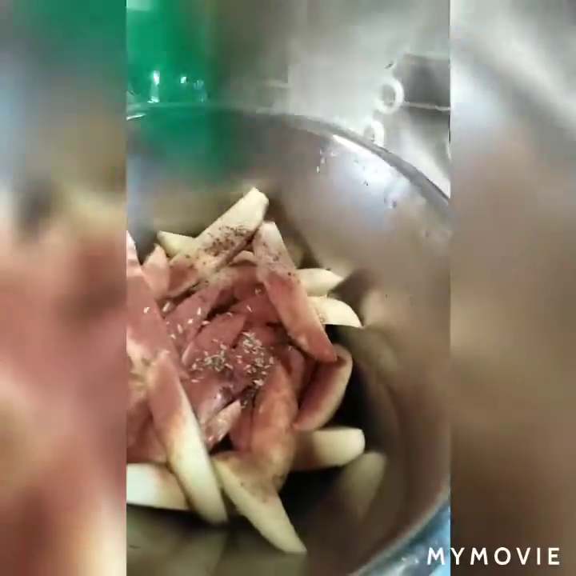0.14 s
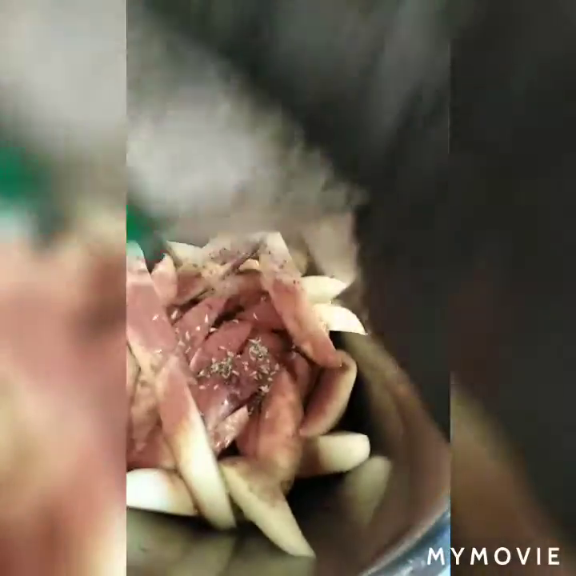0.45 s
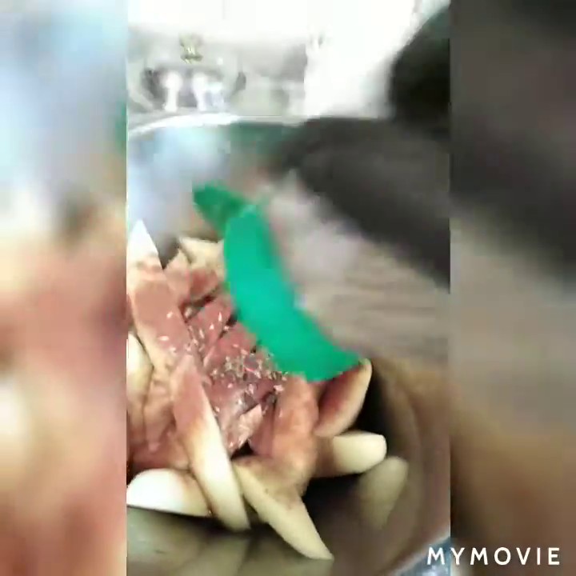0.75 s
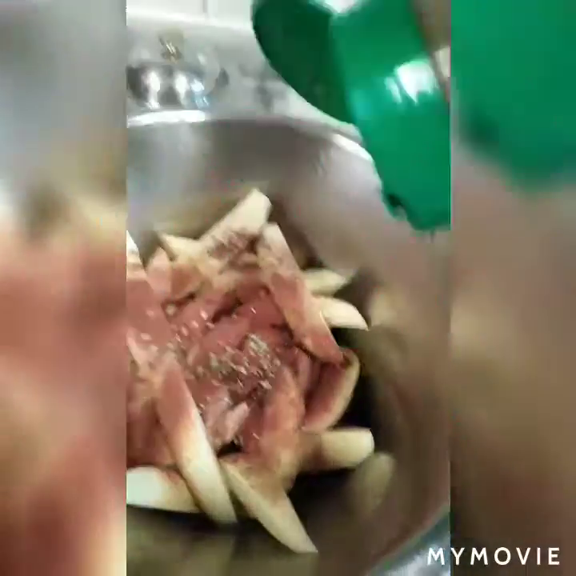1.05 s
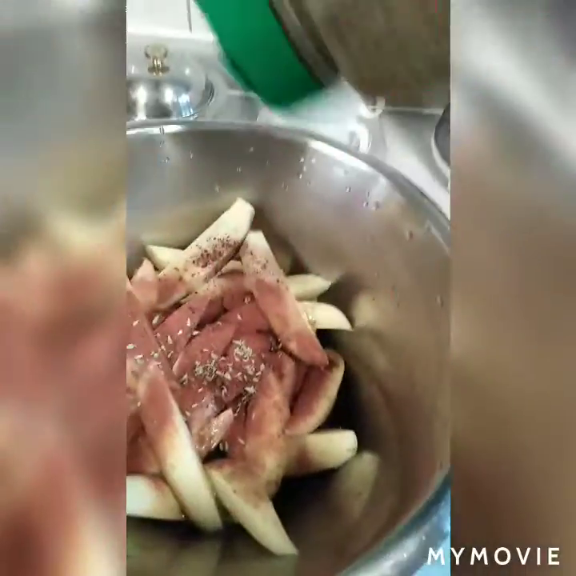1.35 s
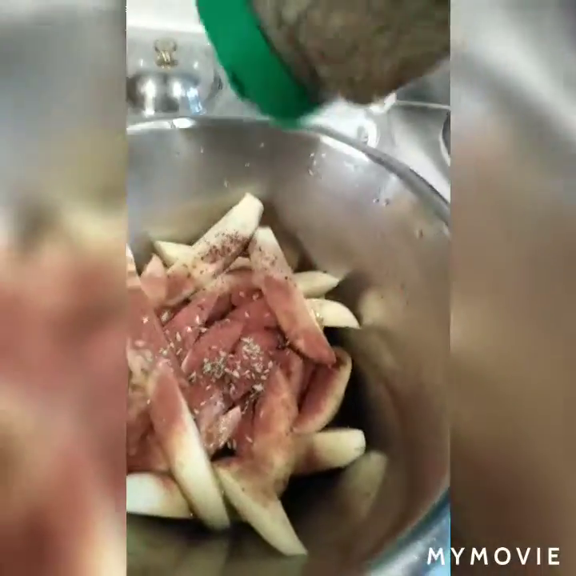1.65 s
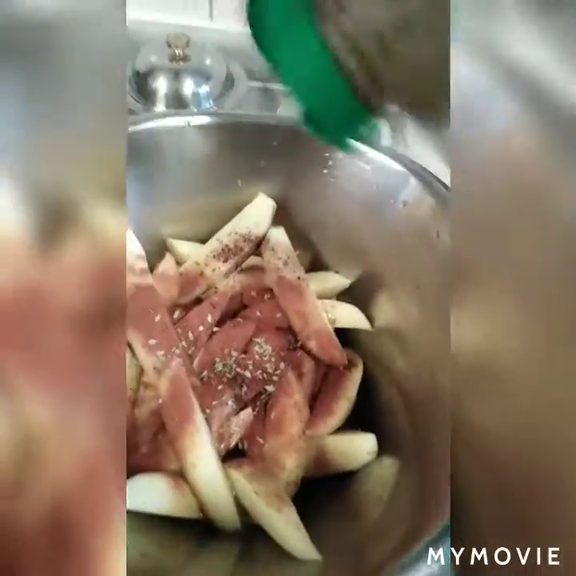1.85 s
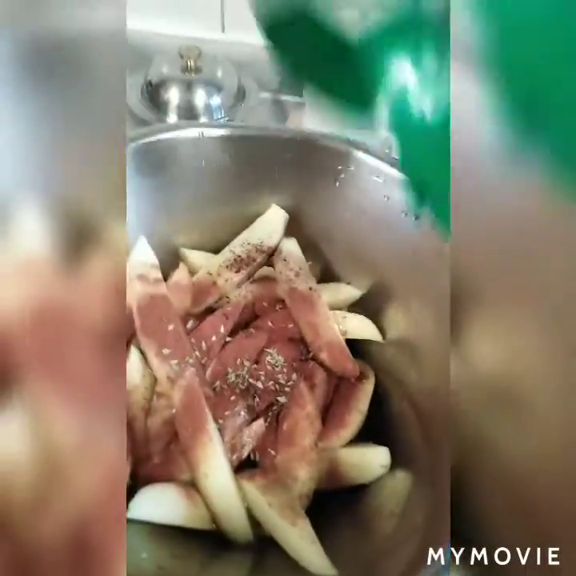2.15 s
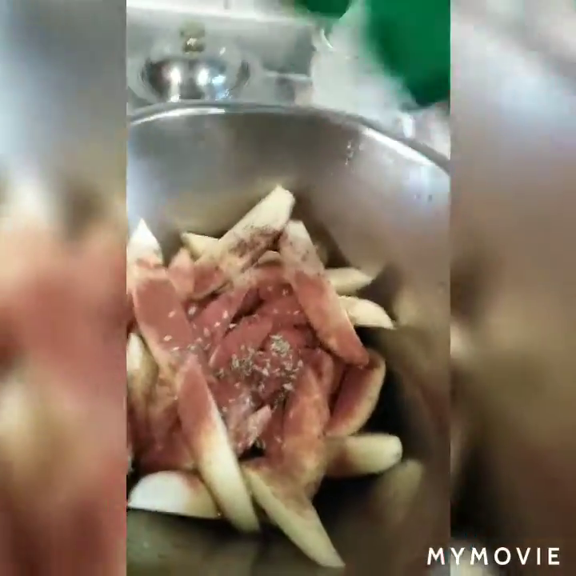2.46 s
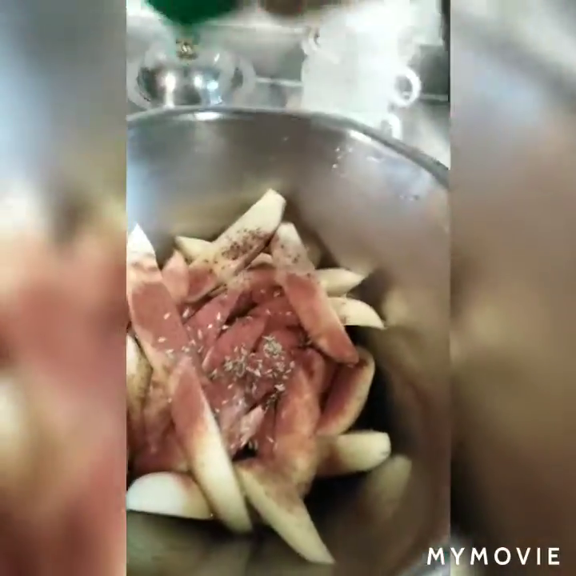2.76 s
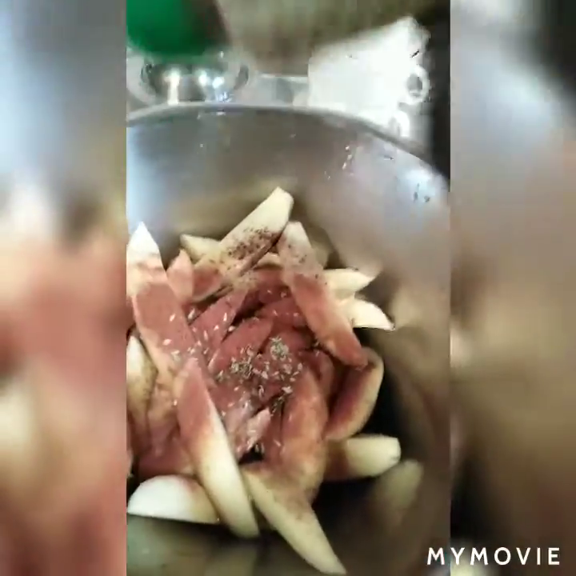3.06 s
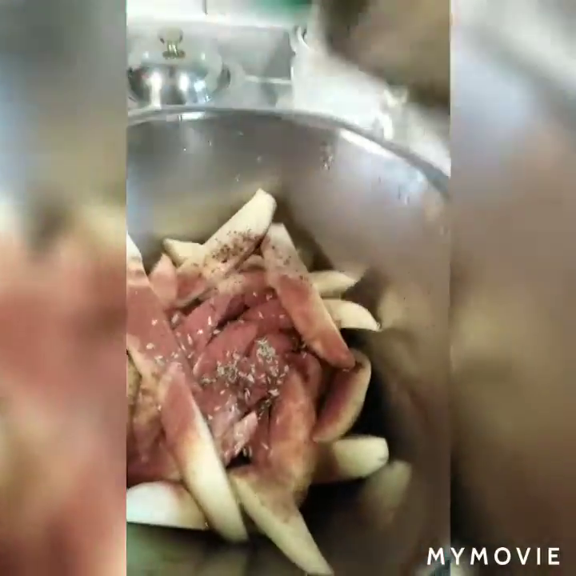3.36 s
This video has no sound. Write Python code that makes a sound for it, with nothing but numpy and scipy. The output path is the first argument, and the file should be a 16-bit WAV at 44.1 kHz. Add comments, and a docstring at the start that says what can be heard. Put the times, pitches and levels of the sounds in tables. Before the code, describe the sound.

Dried herbs shaken in a capped jar, quick hissing rushes with a few hollow knocks

```python
"""Dried herbs shaken in a plastic-capped jar over potatoes in a steel bowl, close by in a small kitchen.
Flakes rush to and fro about ten times a second: random impulses, coloured as hiss and lower rustle.
A few crisp ticks are bright noise bursts. Knocks at the start and near the end sum damped jar modes,
a noise crack and bowl modes; one clearly rings the bowl. A reverberant kitchen surrounds them.
An appliance drones low behind: coloured noise and a faint hum, with a rumble of changing level."""
import sys
import numpy as np
from scipy import signal
from scipy.fft import rfft, irfft
from scipy.io import wavfile

SR = 44100
rng = np.random.default_rng(int(sys.argv[2]) if len(sys.argv) > 2 else 0)


def master(y):
    """Save y as 16-bit WAV."""
    cut = np.clip(np.atleast_2d(y).T, -1, 1)
    pcm = np.round(cut * 32767)  # scale
    wavfile.write(sys.argv[1], SR, pcm.astype(np.int16))


N = 154350
T = np.arange(N) / SR
BAND_EDGE_HZ = 14260


def amp(db):
    """Decibels to gain."""
    return 10 ** (np.asarray(db) / 20)


def unit(x):
    """Scales to rms 1."""
    return x / np.sqrt(np.mean(x ** 2) + 1e-20)


def curve(points):
    """Joins timed points by straight lines."""
    return np.interp(T, *np.transpose(points))


def read(points, hz):
    """Reads a table on a log-frequency axis."""
    point_hz, value = np.transpose(points)
    return np.interp(np.log(hz + 1), np.log(point_hz + 1), value)


def add(mix, start_s, sound):
    """Mixes a sound in at a time."""
    part = mix[max(round(start_s * SR), 0):][:len(sound)]
    part += sound[:len(part)]


def colour(x, points, size=4096):
    """Minimum-phase filter with the given spectrum shape; keeps the power of white noise."""
    bin_hz = abs(np.fft.fftfreq(size, 1 / SR))
    log_gain = np.log(amp(read(points, bin_hz)))
    # the Hilbert transform of the log gain gives the causal phase
    response = np.exp(np.conj(signal.hilbert(log_gain)))
    taps = np.fft.ifft(response).real[:size // 2]
    return signal.oaconvolve(x, taps / np.linalg.norm(taps))[:N]


def wander(rate_hz):
    """Smooth random motion of rms 1: noise under a Gaussian low-pass."""
    hz = np.fft.rfftfreq(N, 1 / SR)
    spectrum = rfft(rng.standard_normal(N)) * np.exp(-(hz / rate_hz) ** 2)
    return unit(irfft(spectrum, N))


def flakes(rate_per_s=9000, spread_db=2.5):
    """Dense tiny collisions: random-sign impulses of uneven size."""
    size = amp(spread_db * np.minimum(rng.exponential(1, N), 5))
    sign = rng.choice([-1., 1.], N)
    hit = rng.random(N) < rate_per_s / SR
    return unit(size * sign * hit)


def herbs(clump_db=1.0, clump_hz=70):
    """Each rush swells, holds and settles; flake-on-flake hiss and wall rustle share the clumping."""
    # rushes: start_s, length_s, level_db (before band gain), extra_rustle_db, rise_s
    rushes = [(.003, 0.0051, -38, -24, 0.00067), (0.257, 0.016, -34.5, 2, 0.0091),
              (.317, 0.018, -29.5, -1, 0.013), (0.409, 0.095, -53, 1.5, .01),
              (0.603, 0.017, -37.5, -1, 0.0035), (.659, 0.019, -36.5, 0.5, 0.018),
              (.789, 0.037, -36.5, 4, 0.0058), (0.862, 0.018, -35, -0.5, 0.014),
              (0.893, 0.029, -42, 3.5, .01), (.987, 0.034, -37.5, 0, 0.016),
              (1.06, 0.044, -38, -0.5, 0.013), (1.187, 0.052, -41, -2, 0.024),
              (1.256, 0.033, -40, -0.5, 0.0055), (1.354, 0.037, -47.5, 1.5, 0.012),
              (1.433, 0.026, -40.5, -2, 0.021), (1.526, 0.034, -49.5, 5, 0.006),
              (1.603, 0.012, -41.5, -0.5, 0.015), (1.694, 0.027, -46, 0, 0.0053),
              (1.772, 0.017, -41, 0.5, 0.01), (1.908, 0.049, -44.5, -0.5, 0.0071),
              (1.997, 0.029, -38.5, -1, 0.019), (2.13, 0.042, -44.5, 2.5, 0.023),
              (2.225, 0.031, -37.5, -1.5, 0.015), (2.348, 0.047, -42.5, -0.5, 0.017),
              (2.446, 0.03, -37.5, 1.5, 0.021), (2.498, 0.038, -51, -11, .01),
              (2.572, 0.035, -45, 0.5, 0.0052), (2.669, 0.038, -38.5, 0.5, 0.012),
              (2.959, 0.028, -40.5, 0, 0.0048), (3.029, .02, -35, 2, 0.018),
              (3.299, 0.026, -38.5, -5, 0.0084), (3.365, 0.02, -34.5, 2, 0.018), (3.424, .08, -58, 6, .01)]
    # loose flakes between rushes: time_s, level_db (before band gain)
    trickle = [(0, -55.5), (.2, -61.5), (.4, -59), (.56, -61), (.75, -65), (1.4, -52), (1.87, -58),
               (2.7, -51.5), (2.86, -67.5), (2.92, -80), (3.0, -65), (3.2, -56), (3.5, -52)]
    # sizzle of flake on flake: freq_hz, relative_density_db_per_hz
    hiss_shape = [(300, -33), (2000, -4.5), (4000, -8.5), (5500, -5), (7500, -0.5), (9500, -1.5),
                  (11500, 0.5), (14000, -3)]
    # rustle on the jar wall: freq_hz, relative_density_db_per_hz
    rustle_shape = [(60, -28), (200, -11), (400, 7.5), (600, -3.5), (1000, 0), (1500, -3.5), (2100, -0.5),
                    (2700, -1.5), (3600, 0.5), (5000, 0.5), (8000, -9), (14000, -10)]
    fall_s, settle_s, settle_db = 0.015, 0.042, -17  # fast fall, then slower settling
    hiss_db, rustle_db = 2, -4

    hiss_power = rustle_power = amp(curve(trickle)) ** 2
    for start_s, length_s, level_db, extra_rustle_db, rise_s in rushes:
        before_s = np.maximum(start_s - T, 0)
        after_s = np.maximum(T - start_s - length_s, 0)
        fall = np.exp(-after_s / fall_s)
        settle = amp(settle_db) * np.exp(-after_s / settle_s)
        level = amp(level_db) * np.exp(-before_s / rise_s) * np.maximum(fall, settle)
        hiss_power = hiss_power + level ** 2
        rustle_power = rustle_power + (level * amp(extra_rustle_db)) ** 2
    clumps = amp(clump_db * wander(clump_hz))
    hiss = colour(flakes() * clumps * np.sqrt(hiss_power), hiss_shape)
    rustle = colour(flakes() * clumps * np.sqrt(rustle_power), rustle_shape)
    return amp(hiss_db) * hiss + amp(rustle_db) * rustle


def patchy(x, patch_db, patch_hz=600, patch_s=0.015, size=512):
    """The colour shifts in small random time-frequency patches as the heap of flakes tumbles."""
    hz, t, z = signal.stft(x, SR, nperseg=size)
    across_hz = np.fft.fftfreq(len(hz), hz[1])[:, None] * patch_hz
    across_s = np.fft.fftfreq(len(t), t[1]) * patch_s
    blur = np.exp(-across_hz ** 2 - across_s ** 2)
    field = unit(np.fft.ifft2(np.fft.fft2(rng.standard_normal(z.shape)) * blur).real)
    return signal.istft(z * unit(amp(patch_db * field)), SR, nperseg=size)[1][:N]


def ticks():
    """Crisp ticks at the cap: decaying noise bursts with a bright spectrum."""
    # ticks: start_s, level_db, decay_s (time constant)
    tick_list = [(0.568, -43, 0.021), (0.5966, -29, 0.0014), (.962, -34, 0.0056), (1.01, -32.5, 0.012),
                 (1.187, -29, 0.015), (1.306, -36.5, .004), (2.092, -35, 0.01), (2.307, -33, 0.0077),
                 (2.878, -54.5, 0.015)]
    # tick spectrum: freq_hz, relative_density_db_per_hz
    tick_shape = [(300, -47), (3000, -8), (5000, -1), (6500, 9.5), (8300, 7), (10000, -2), (14500, 1)]
    out, t = np.zeros(N), T[:SR // 10]
    for start_s, level_db, decay_s in tick_list:
        add(out, start_s, amp(level_db) * np.exp(-t / decay_s) * rng.standard_normal(len(t)))
    return colour(out, tick_shape)


def ring(modes, t, hardness_hz):
    """Dying modes after a blow; a soft blow hardly reaches the high ones."""
    out = 0
    for freq_hz, level_db, t60_s in modes:
        reach = 1 / np.hypot(1, (freq_hz / hardness_hz) ** 2)
        out = out + reach * amp(level_db - 60 * t / t60_s) * np.sin(2 * np.pi * freq_hz * t)
    return out


def knocks():
    """Jar modes, a noise crack and bowl modes per blow; returns direct sound and send to the room."""
    # knocks: start_s, level_db, hardness_hz, contact_s, pitch_ratio,
    #         crack_db, crack_top_hz, crack_decay_s, bowl_db, room_db
    knock_list = [(0.081, -26, 200, 0.0024, 0.77, -27, 400, .004, -30, -9),
                  (0.1052, -7.5, 530, 0.0019, 1.012, -12.5, 1740, 0.0066, -23, -15.5),
                  (3.0042, -9, 298, 0.0027, 1.073, -31, 500, .004, -48, -16),
                  (3.0277, -10.5, 1780, 0.0015, 1.46, -8, 5970, 0.012, -0.5, -15),
                  (3.035, -12, 800, 0.00069, 1.463, -21, 3030, .005, -28, -16.5),
                  (3.229, -11, 970, 0.0019, 0.952, -5, 2000, 0.0055, -34, -15.5),
                  (3.2634, -18, 700, 0.0019, 1, -4, 2400, .005, -27, -11)]
    # hand-held jar modes at pitch ratio 1: freq_hz, level_db, t60_s
    jar_modes = [(130.6, -14, 0.07), (219, -15, 0.048), (298.3, 0, 0.041), (406.6, 0.5, 0.055),
                 (474.4, -0.5, 0.047), (969, -6, 0.069), (1190, -41, 0.026), (1254, 3, 0.013),
                 (1340, -31, 0.019), (2266, 17.5, 0.0074)]
    # steel bowl modes: freq_hz, level_db, t60_s
    bowl_modes = [(484, -26, .55), (618, -7, .09), (673, -22, .4), (728, -20, .38), (786, -23, .29),
                  (958, -4, .08), (1005, -8, .07), (1058, -16, .25), (1152, -12, .2), (1258, -21, .35),
                  (1324, -25, .25), (1597, -23, .46), (1615, -21, .24), (1677, -16, .27), (1730, -24, .12),
                  (2728, -27, .2), (3422, -21, .16), (3917, -27, .12)]
    # crack spectrum: freq_hz, relative_density_db_per_hz
    crack_shape = [(100, -11), (450, 12), (750, 1), (1200, 8.5), (1700, -9.5), (2300, 1), (2900, -10),
                   (3400, -5.5), (3750, -6.5), (4400, 2), (6500, -11), (14000, -7.5)]
    out, t = np.zeros((2, N)), T[:SR]
    # low cut of the microphone: the knocks carry little deep bass
    low_cut = signal.butter(2, 42, "highpass", fs=SR, output="sos")
    for (start_s, level_db, hardness_hz, contact_s, pitch_ratio,
         crack_db, crack_top_hz, crack_decay_s, bowl_db, room_db) in knock_list:
        jar = ring(jar_modes, t * pitch_ratio, hardness_hz)  # a higher pitch also dies faster
        bowl = ring(bowl_modes, t, 2 * hardness_hz)
        onset = 1 - np.exp(-(t / contact_s) ** 2)
        crack = colour(np.exp(-t / crack_decay_s) * rng.standard_normal(SR), crack_shape)[:SR]
        crack = signal.sosfilt(signal.butter(2, crack_top_hz, fs=SR, output="sos"), crack)
        blow = (jar + amp(bowl_db) * bowl) * onset + amp(crack_db) * crack
        knock = amp(level_db) * signal.sosfilt(low_cut, blow)
        add(out[0], start_s, knock)
        add(out[1], start_s, amp(room_db) * knock)
    return out


def kitchen(x, first_s=0.0039, size=256):
    """Dense reflections: a noise tail, each band dying at its own speed."""
    # reverberation: freq_hz, t60_s
    reverb = [(100, 1), (400, 0.47), (1200, .4), (4000, 0.33), (14000, 0.17)]
    hz, t, z = signal.stft(rng.standard_normal(SR), SR, nperseg=size)
    decay = amp(-60 * t / read(reverb, hz)[:, None])
    tail = signal.istft(z * decay, SR, nperseg=size)[1][:SR]
    tail = tail * np.clip(T[:SR] / first_s - 1, 0, 1)  # silent until first_s, full at twice that
    return signal.fftconvolve(x, tail / np.linalg.norm(tail))[:N]


def appliance():
    """Steady coloured air noise, a rumble of changing level and a faint sine hum."""
    # air noise: freq_hz, relative_density_db_per_hz
    drone_shape = [(25, -33), (75, -33), (150, -27), (235, -26.5), (280, -5.5), (312, 6.5), (360, -3),
                   (440, -17.5), (560, -19.5), (1000, -50), (3000, -46), (14000, -45)]
    # low rumble of the room: freq_hz, relative_density_db_per_hz
    rumble_shape = [(25, -38), (70, -15), (100, -19), (125, 5.5), (160, -8), (240, -8.5), (400, -10.5),
                    (700, -21.5), (14000, -73)]
    # rumble level: time_s, level_db
    rumble_level = [(0, -48.5), (.35, -49), (.55, -59.5), (1.2, -64), (1.9, -60.5), (2.1, -74.5),
                    (2.25, -67), (2.7, -68), (2.92, -73), (3.3, -90), (3.5, -46)]
    drone_db, hum_db, hum_hz = -52.5, -72.5, 58  # rms levels
    air = amp(drone_db) * colour(rng.standard_normal(N), drone_shape)
    rumble = colour(rng.standard_normal(N), rumble_shape) * amp(curve(rumble_level))
    hum = amp(hum_db) * np.sqrt(2) * np.sin(2 * np.pi * hum_hz * T)
    return air + rumble + hum


def scene(herb_room_db=-12.5):
    """Jar and bowl close by, the kitchen around them, the appliance behind."""
    shaking = patchy(herbs(), patch_db=1.52) + ticks()
    knocking, knock_send = knocks()
    room = kitchen(amp(herb_room_db) * shaking + knock_send)
    return (shaking + knocking + room + appliance())[None]


def record(dry):
    """The recorder's band limit: a linear-phase low-pass."""
    taps = signal.firwin(801, BAND_EDGE_HZ, window=("kaiser", 8), fs=SR)
    return signal.oaconvolve(dry, taps[None], "same")


dry = scene()
out = record(dry)
master(out)
```